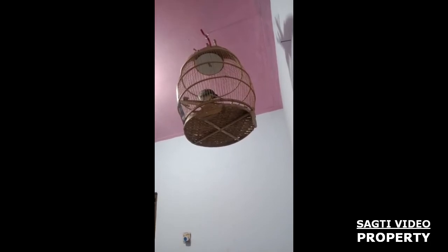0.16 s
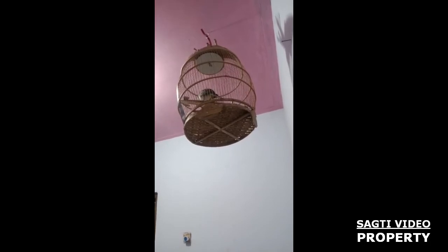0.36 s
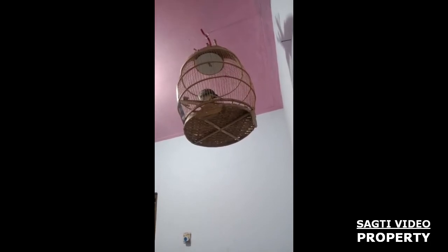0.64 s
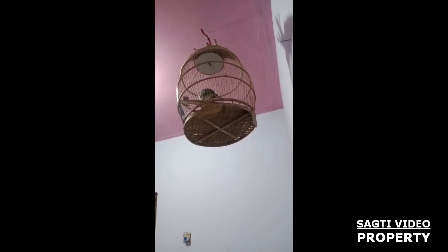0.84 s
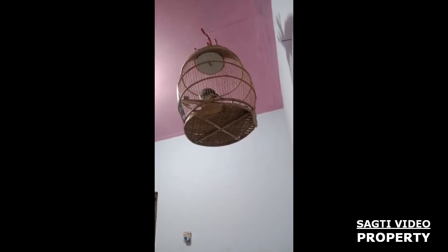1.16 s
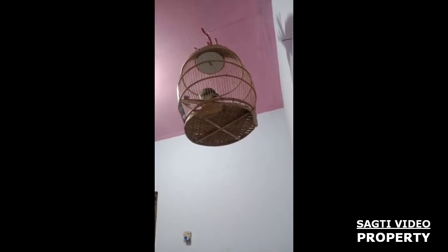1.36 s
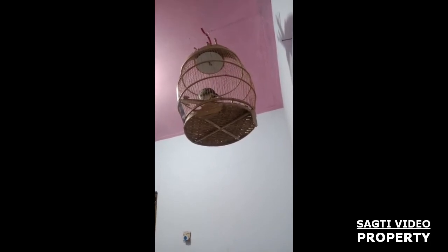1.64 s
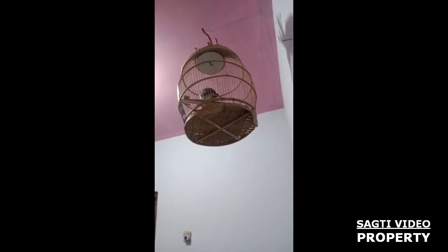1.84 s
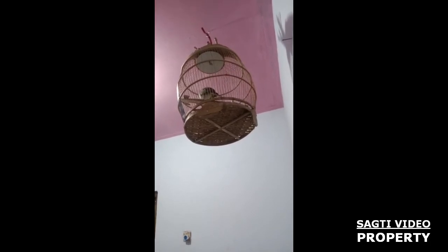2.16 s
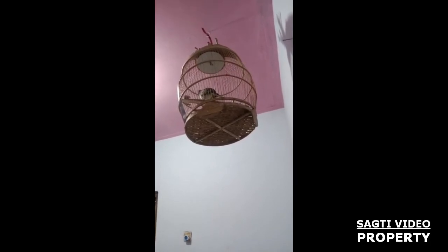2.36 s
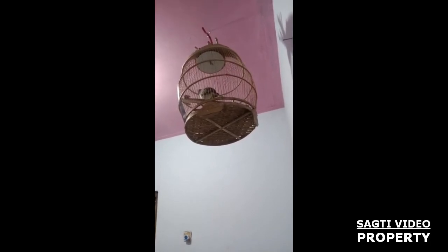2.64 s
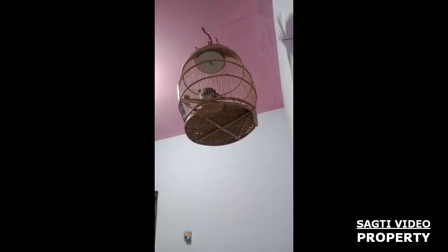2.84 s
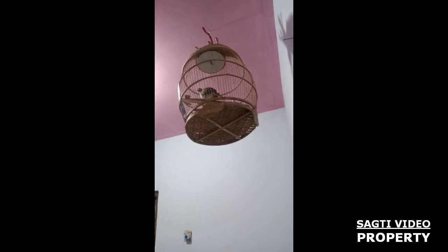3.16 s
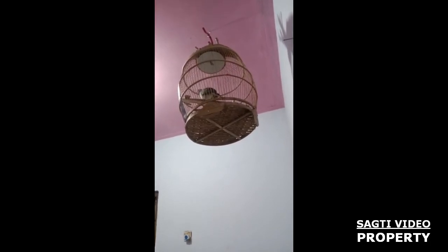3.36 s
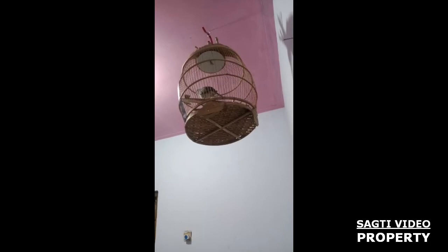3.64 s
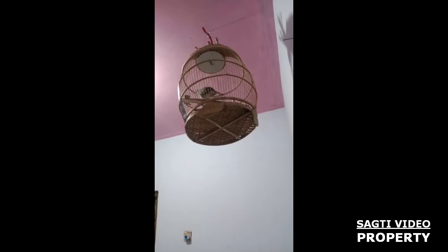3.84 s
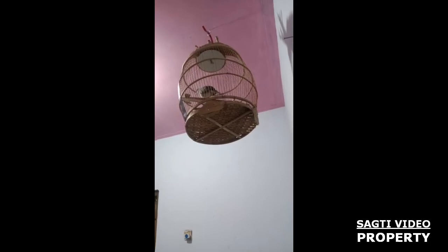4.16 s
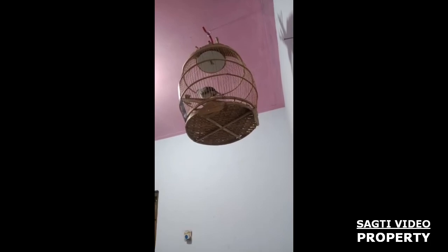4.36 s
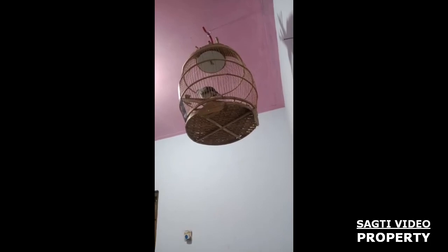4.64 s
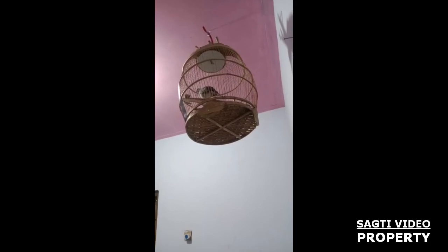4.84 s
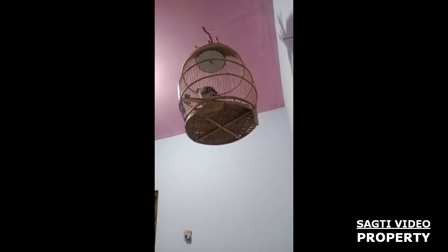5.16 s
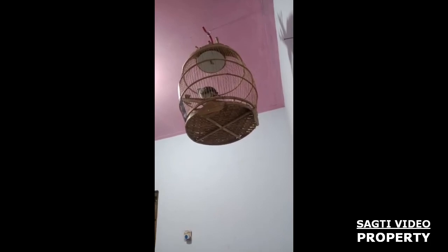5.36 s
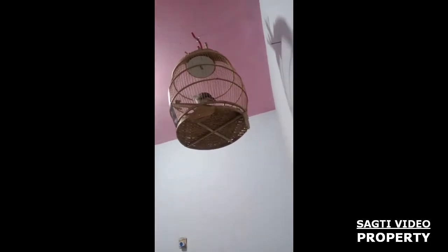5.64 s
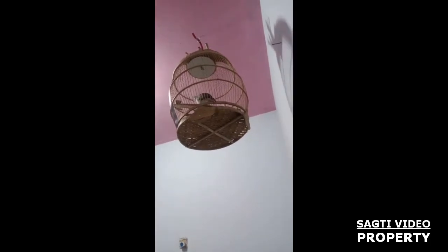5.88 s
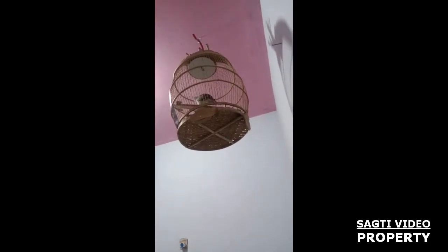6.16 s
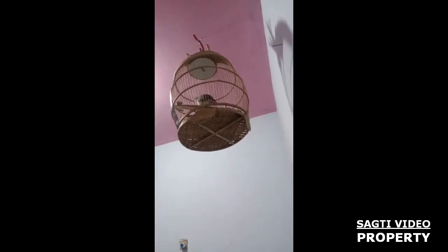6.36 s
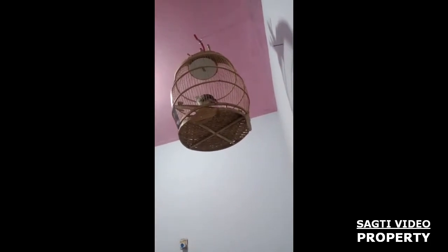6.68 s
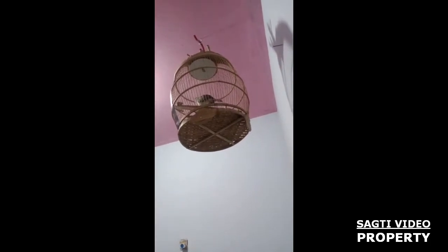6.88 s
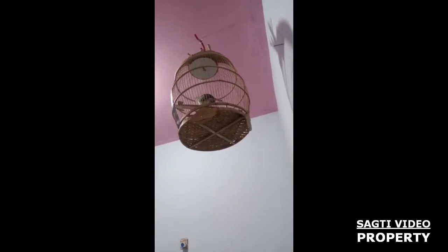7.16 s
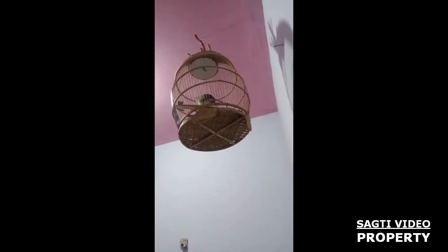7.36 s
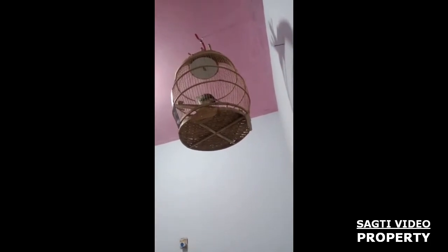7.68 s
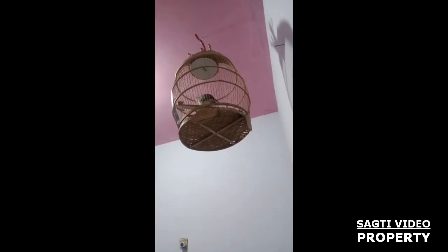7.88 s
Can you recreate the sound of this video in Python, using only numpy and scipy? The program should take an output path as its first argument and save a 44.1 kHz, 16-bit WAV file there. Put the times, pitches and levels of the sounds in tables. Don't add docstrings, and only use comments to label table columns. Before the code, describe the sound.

A quiet reverberant room with low steady hiss and a faint wavering hum at first. Husks and claws tick on cane, distant doves coo softly, then there is a pause. A nearby dove puffs and delivers a strong rolling coo with weaker lower coos behind; a sharp little knock precedes its second, similar coo. Hard walls smear the notes slightly, and the microphone catches the near bird clearly, with dull treble limits.

```python
import sys
import numpy as np
from scipy import signal
from scipy.io import wavfile
from scipy.ndimage import uniform_filter1d, minimum_filter1d

SR = 44100
rng = np.random.default_rng(int(sys.argv[2]) if len(sys.argv) > 2 else 0)


def invert_db(x):
    u = np.asarray(x, float) / 20
    return 10 ** u


def digitize_waveform(pressure):
    field = np.atleast_2d(pressure).T
    bounded = np.clip(field, -1, 1)
    quanta = np.round(bounded * 32767).astype(np.int16)
    wavfile.write(sys.argv[1], SR, quanta)


N = 353417


def evened(x):
    return x / np.sqrt(np.mean(x ** 2) + 1e-20)


def read(points, hz):
    f, value = np.transpose(points)
    return np.interp(np.log(hz + 1), np.log(f + 1), value)


def add(mix, start_s, sound):
    part = mix[round(start_s * SR):][:len(sound)]
    part += sound[:len(part)]


def resonate(x, hz, width_hz):
    b, a = signal.iirpeak(hz, hz / width_hz, SR)
    once = signal.lfilter(b, a, x)
    return signal.lfilter(b, a, once)


def shaped(db_field):
    z = rng.standard_normal(db_field.T.shape + (2,)) @ [1, 1j]
    noise = signal.istft(z.T * invert_db(db_field), nperseg=2048, noverlap=1536)[1]
    return evened(noise[:N])


OVERTONE_DB = [-26, -34.5, -57.5, -59, -52, -62.5, -74, -72.5, -73.5]


def whistle(turn, flipped, cluck_db, bright_db, soft_db):
    overtones = 0
    for k, h_db in enumerate(OVERTONE_DB):
        overtones = overtones + invert_db(h_db + 0.017 * k * soft_db) * np.sin((k + 2) * turn)
    fundamental = invert_db(cluck_db * (1 - flipped)) * np.sin(turn)
    return fundamental + invert_db(bright_db) * flipped ** 2 * overtones


# f/Hz, width/Hz, level/dB
GULLET_MODES = [(370.4, 300, -20.5), (820, 190, -4), (1055.3, 53, 10.5), (1434, 150, -2), (1533, 330, -13)]


def gullet_air():
    air = resonate(rng.standard_normal(N), 1100, 3300)
    return evened(sum(invert_db(db) * resonate(air, hz, width_hz) for hz, width_hz, db in GULLET_MODES))


def dove(notes, cluck_hz, cluck_db, jump_s, scoop, waver, breath_db, bright_db):
    lead_s, held_s = 0.04, 0.14
    sag_per_s = 0.32
    swell_db, fade_db, held_dull_db = 1, -5, -4.5
    voice, breath = np.zeros(N), np.zeros(N)
    loudest_db = max(note[-1] for note in notes)
    wobble = 1 + 0.006 * evened(resonate(rng.standard_normal(SR), 25, 46))
    for start_s, length_s, top_hz, db in notes:
        t = np.arange(-lead_s, length_s, 1 / SR)
        u = np.clip(t / length_s, 0, 1)
        held = length_s > held_s

        flipped = 0.5 + 0.5 * np.tanh((t - jump_s) / 0.0012)
        depth = scoop * min(0.5 + length_s / 0.25, 1.0)
        bend = depth * np.exp(-np.maximum(t - jump_s, 0) / (0.15 * length_s))
        hz = top_hz * (1 - sag_per_s * length_s * u ** 2) * (1 - bend)
        hz += (cluck_hz - hz) * (1 - flipped)
        note_wobble = wobble[rng.integers(SR // 2):][:len(t)]
        turn = 2 * np.pi * np.cumsum(hz * note_wobble) / SR

        note_bright_db = bright_db + held_dull_db * held
        tone = whistle(turn, flipped, cluck_db, note_bright_db, db - loudest_db)
        edge = np.clip(t / 0.0044, 0, 1) * np.clip((length_s - t) / 0.013, 0, 1)
        slope_db = swell_db if held else fade_db
        level = invert_db(db + slope_db * (u - 0.5)) * np.sqrt(2)
        add(voice, start_s - lead_s, level * edge * tone)

        decay_s = np.where(t < -0.004, 0.003, 0.012)
        add(breath, start_s - lead_s, invert_db(db + breath_db) * np.exp(-abs(t + 0.004) / decay_s))
    flutter = evened(resonate(rng.standard_normal(N), 34.1, 22))
    return voice * (1 + waver * flutter) + breath * gullet_air()


# t/s, length/s, f/Hz, level/dB
NEAR_NOTES = [(3.771, .17, 1327, -8), (3.949, 0.069, 1221, -17), (4.011, 0.041, 1189, -16),
              (4.086, 0.031, 1190, -15), (4.158, .042, 1205, -14.5), (4.251, 0.058, 1235, -15),
              (4.419, 0.09, 1301, -13), (6.815, .175, 1313, -10), (7.003, .036, 1225, -17),
              (7.064, 0.042, 1204, -15), (7.139, 0.039, 1198, -18), (7.221, 0.038, 1185, -13.5),
              (7.334, 0.0883, 1266, -13.5)]


def near_dove():
    return dove(NEAR_NOTES, cluck_hz=1000, cluck_db=0.5, jump_s=0.007, scoop=0.06, waver=0.27,
                breath_db=-5.0, bright_db=3.5)


def sung(song, coos):
    notes = []
    for start_s, shift_hz, sink_hz_per_s, effort_db in coos:
        for s, length_s, hz, db in song:
            notes.append((start_s + s, length_s, hz + shift_hz + sink_hz_per_s * s, db + effort_db))
    return notes


# t after start/s, length/s, f/Hz, level/dB
MIDDLE_NOTES = [(0, .16, 1171, -29), (.18, .035, 1082, -26), (.245, .03, 1103, -27),
                (.305, .025, 1115, -28.5), (.365, .025, 1060, -34.5), (.45, 0.029, 1028, -27.5),
                (.57, .13, 1084, -28.5)]
# t/s, pitch shift/Hz, sinking/(Hz/s), effort/dB
MIDDLE_STARTS = [
    (.69, 5.5, -2.2, -0.9),
    (4.422, 13.5, -87, 1.5),
    (6.831, -23.5, 2.5, -6),
]


def middle_dove():
    return dove(sung(MIDDLE_NOTES, MIDDLE_STARTS), cluck_hz=985, cluck_db=-1.5, jump_s=0.008, scoop=0.048,
                waver=0.28, breath_db=-21.5, bright_db=0.5)


# t after start/s, length/s, f/Hz, level/dB
LOW_NOTES = [(0.004, 0.068, 885, -23), (.25, .05, 863.5, -29), (.31, .06, 835, -31), (.37, .04, 800, -30),
             (.435, .05, 815, -36), (.495, .036, 878, -27), (.55, .03, 820, -33), (.6, 0.03, 863, -31.5)]
# t/s, pitch shift/Hz, sinking/(Hz/s), effort/dB
LOW_STARTS = [
    (.655, 1.5, 0.083, 1.5),
    (4.458, -10.5, 0.11, -0.7),
    (6.815, 9, 0.1, 4.5),
]


def low_dove():
    return dove(sung(LOW_NOTES, LOW_STARTS), cluck_hz=720.6, cluck_db=-8.0, jump_s=0.0071, scoop=0.012,
                waver=0.33, breath_db=-13.5, bright_db=-7)


# t/s, peak level/dB, 1-4 kHz part re peak/dB, length/s
TICK_EVENTS = [(0.234, -40.5, -1, 0.015), (0.3344, -49.5, -7.5, 0.021), (0.423, -39.5, -2, 0.018),
               (0.579, -59.5, -1, 0.041), (0.8363, -50.5, -11, 0.045), (0.863, -39.5, -2.5, 0.015),
               (2.126, -63.5, -10, 0.05), (3.678, -46.5, -4.5, 0.014), (6.6006, -58.5, -9.5, 0.025),
               (7.0075, -55.5, -2, 0.03), (7.286, -45, -9, 0.018)]
# f/Hz, level per Hz/dB
TICK_SPECTRUM = [(2940, -29), (5000, -13.5), (5790, -22.5), (8300, 9), (10300, -7.5), (11400, -4),
                 (14900, -4.5), (15500, 0.5)]


def ticks():
    hz = np.fft.rfftfreq(2048, 1 / SR)[:, None] + np.zeros(N // 512 + 5)
    bright = shaped(read(TICK_SPECTRUM, hz))
    middle = resonate(rng.standard_normal(N), 2600, 2500)
    middle = evened(resonate(middle, 2600, 2500))
    bright_gate, middle_gate = np.zeros((2, N))
    t = np.arange(SR // 4) / SR
    for start_s, db, middle_db, length_s in TICK_EVENTS:
        decay = np.exp(-t / length_s)
        add(bright_gate, start_s, invert_db(db - 5.5) * decay)
        add(middle_gate, start_s, invert_db(db - 2.5 + middle_db) * decay)
    return bright * bright_gate + middle * middle_gate


# t/s, peak level/dB, f/Hz, t60/s
TAP_EVENTS = [
    (3.484, -38.5, 3800, 0.011),
    (5.185, -35.5, 2290, 0.068),
    (6.5139, -23.5, 2930, 0.028),
    (6.513, -22.5, 3140, 0.014),
    (6.5134, -59.5, 3980, 0.0092),
]


def taps():
    out = np.zeros(N)
    t = np.arange(SR // 4) / SR
    for start_s, db, ring_hz, t60_s in TAP_EVENTS:
        rise = np.sin(np.clip(t / 0.00053, 0, np.pi / 2)) ** 2
        add(out, start_s, invert_db(db - 60 * t / t60_s) * rise * np.sin(2 * np.pi * ring_hz * t))
    return out


# t/s, level/dB, f/Hz, length/s
BUMP_EVENTS = [(0.426, -45.5, 380, 0.023), (0.626, -34, 1264, 0.052), (0.627, -46.5, 2600, 0.15),
               (0.851, -35.5, 2670, 0.015), (1.05, -44, 131, 0.089), (2.4, -49.5, 122, 0.11),
               (2.967, -50, 278, 0.028), (3.481, -39, 3170, 0.012), (3.7, -37.5, 1024, 0.032),
               (3.736, -29, 1400, 0.022), (4.596, -41.5, 434, 0.024), (4.761, -36, 309, 0.018),
               (5.18, -40.5, 300, 0.017), (6.065, -47.5, 90, 0.044), (6.512, -41, 2910, 0.005),
               (6.743, -37, 1000, 0.044), (6.785, -23.5, 1177, 0.016), (7.191, -52.5, 280, 0.084)]


def bumps():
    out = np.zeros(N)
    t = np.arange(SR // 4) / SR
    for start_s, db, hz, length_s in BUMP_EVENTS:
        width_hz = 0.8 * hz
        puff = resonate(rng.standard_normal(len(t)), hz, width_hz)
        puff = evened(resonate(puff, hz, width_hz))
        rise = np.clip(t / (0.4 * length_s), 0, 1)
        add(out, start_s, invert_db(db) * rise * np.exp(-t / length_s) * puff)
    return out


# f/Hz, t60/s
WALL_DECAY = [(200, 0.23), (650, 0.59), (850, 0.49), (1050, 0.54), (1300, 0.38), (1600, 0.15), (3000, 0.4),
              (8000, 0.088), (15000, 0.23)]
# delay/s, level/dB
EARLY_ECHOES = [(.0065, -5.5), (0.011, -21), (0.015, -8.5), (0.022, -13), (.033, -10), (.041, -9)]


def room(x, early_db, wet_db, gap_s):
    echoes = np.zeros(SR)
    at = np.arange(round(gap_s * SR), SR - 20, 20)
    echoes[at + rng.integers(0, 20, len(at))] = rng.choice([-1., 1.], len(at))
    hz, t, z = signal.stft(echoes, SR, nperseg=256)
    decay_db = -60 * t / read(WALL_DECAY, hz)[:, None]
    response = signal.istft(z * invert_db(decay_db), SR, nperseg=256)[1]
    response = invert_db(wet_db) * response / np.linalg.norm(response)
    delay_s, db = np.transpose(EARLY_ECHOES)
    response[np.round(delay_s * SR).astype(int)] += invert_db(db + early_db)
    response[0] = 1
    return signal.fftconvolve(x, response / np.linalg.norm(response))[:N]


# t/s, f/Hz, level/dB
HUM_TRACK = [
    (0, 696, -58.5),
    (.3, 696, -59),
    (0.597, 690, -57.5),
    (0.661, 686, -63),
    (3.5, 701, -72),
    (8.01, 752.4, -76),
]


def hum():
    s, hz, db = np.transpose(HUM_TRACK)
    t = np.arange(N) / SR
    waver = 1 + 0.3 * evened(uniform_filter1d(rng.standard_normal(N), 1500))
    turn = 2 * np.pi * np.cumsum(np.interp(t, s, hz)) / SR
    return invert_db(np.interp(t, s, db)) * waver * np.sqrt(2) * np.sin(turn)


# f/Hz, level per Hz/dB
WASH_SPECTRUM = [(20, -10.5), (54, -28.5), (65, -4), (120, -4), (250, -10), (400, -12), (600, -13),
                 (1000, -15), (2200, -13), (3400, -13.5), (4100, -20.5), (5200, -39), (6800, -74),
                 (11000, -110)]
# f/Hz, level per Hz/dB
HISS_SPECTRUM = [(3060, -32.5), (5200, -14), (5670, -16), (6390, -9.5), (8360, 1.5), (11800, -11.5),
                 (13800, -7.5), (14900, -8.5), (15500, -6)]
# t/s, level/dB
TREBLE_DRIFT = [(0, -1.5), (0.501, -3), (1, 0.2), (1.5, -0.3), (1.85, -2), (2.1, -6), (2.2, -0.4),
                (2.602, -0.47), (5.001, 0.26), (5.402, -1.5), (5.798, 0.2), (6.1, 0.3), (6.198, -1.5),
                (6.5, -3.5), (7.001, 2.1), (7.5, 0.5), (8.01, -1)]


def wash_and_hiss():
    wash_db, hiss_db = -50.5, -71
    frames = N // 512 + 5
    hz = np.fft.rfftfreq(2048, 1 / SR)[:, None]
    patches = uniform_filter1d(rng.standard_normal((frames, 1025)), 6, 0)
    patches = evened(uniform_filter1d(patches, 24, 1)).T
    drift_db = np.interp(np.arange(frames) * 512 / SR, *np.transpose(TREBLE_DRIFT))
    patch_db = np.clip(hz / 600, 0, 1.5) * patches
    treble_db = np.clip(hz / 2500, 0, 2) * drift_db
    wash = shaped(read(WASH_SPECTRUM, hz) + patch_db + treble_db)
    hiss = shaped(read(HISS_SPECTRUM, hz) + 0.83 * patches + 1.1 * drift_db)
    return invert_db(wash_db) * wash + invert_db(hiss_db) * hiss


def scene():
    rustle = ticks() + taps() + bumps()
    mix = room(near_dove(), early_db=-5, wet_db=-3, gap_s=0.012)
    mix += room(middle_dove() + low_dove(), early_db=-4.0, wet_db=-3.0, gap_s=0.011)
    mix += room(rustle, early_db=-9, wet_db=-1.5, gap_s=0.011)
    return (mix + wash_and_hiss() + hum())[None]


def roll_off(x):
    return signal.sosfilt(signal.butter(12, 15640, fs=SR, output="sos"), x)


def record(dry):
    x = signal.sosfilt(signal.butter(1, 45, "high", fs=SR, output="sos"), dry)
    peak = -minimum_filter1d(-abs(x), size=90)
    swing = uniform_filter1d(peak, size=60)
    x = x / (1 + (swing / 0.8) ** 6) ** (1 / 6)
    return roll_off(x)


dry = scene()
out = record(dry)
digitize_waveform(out)
```